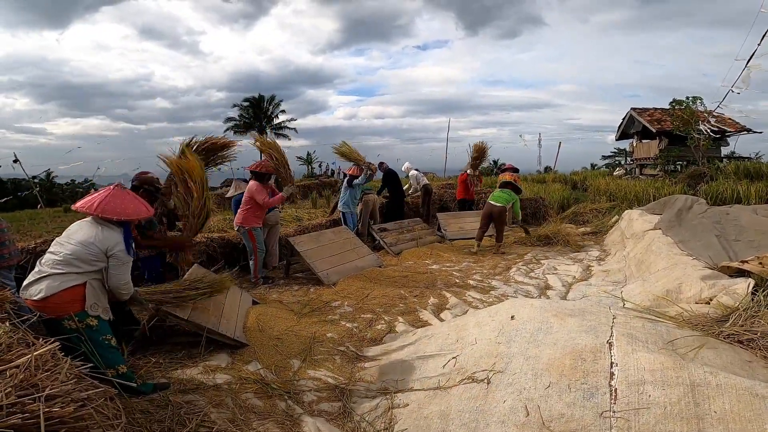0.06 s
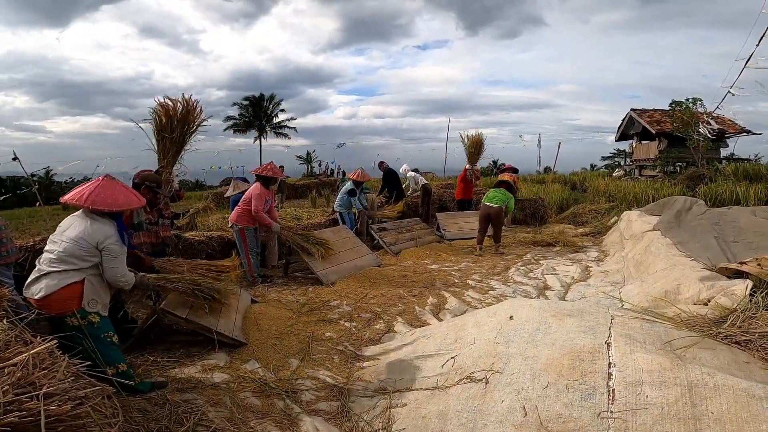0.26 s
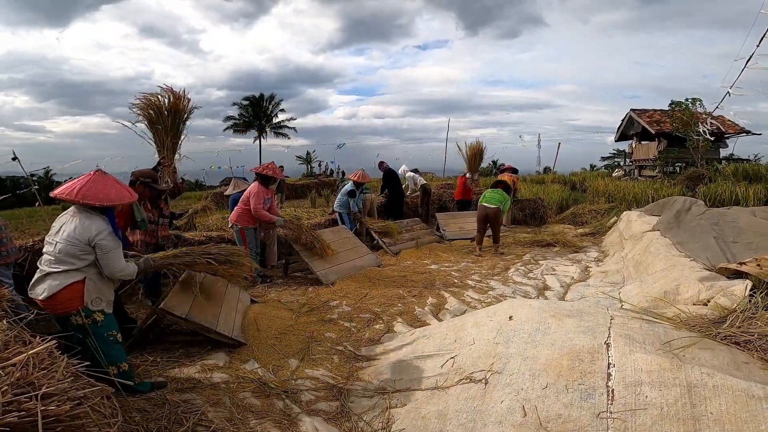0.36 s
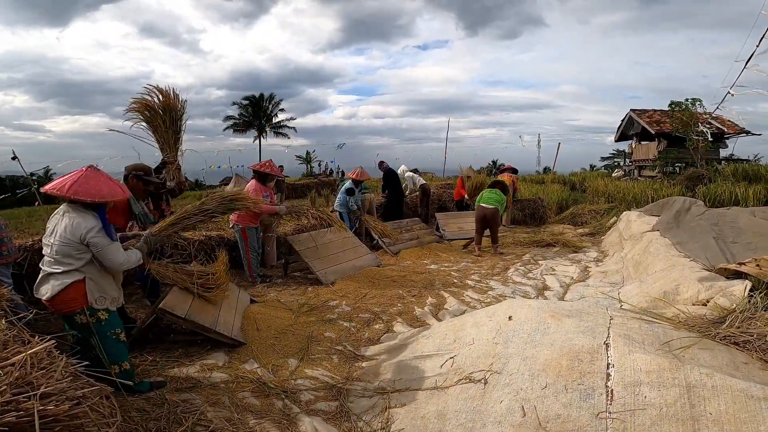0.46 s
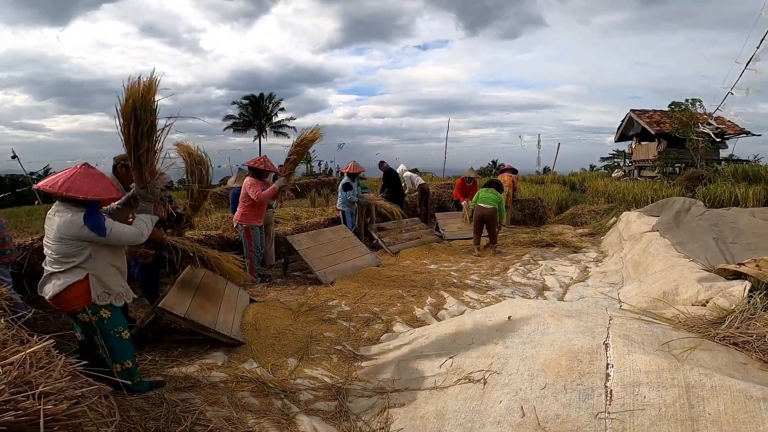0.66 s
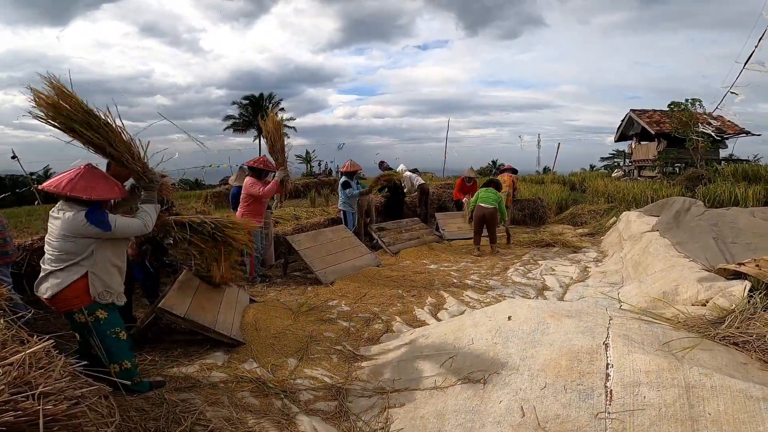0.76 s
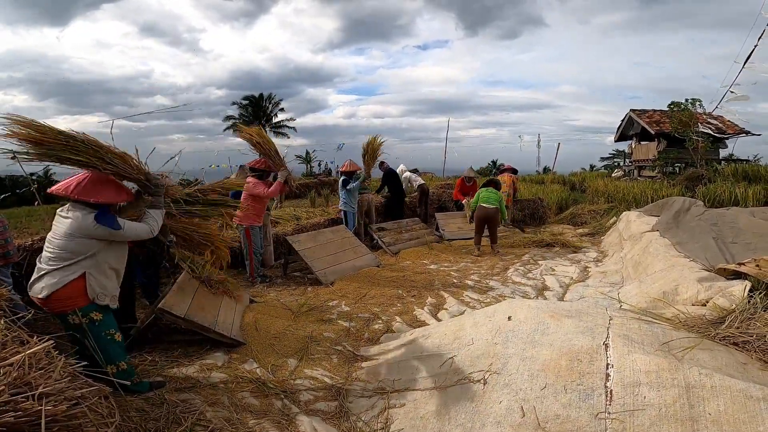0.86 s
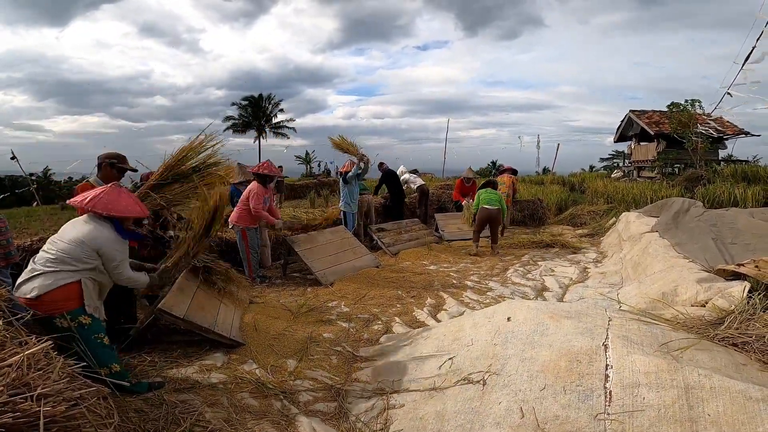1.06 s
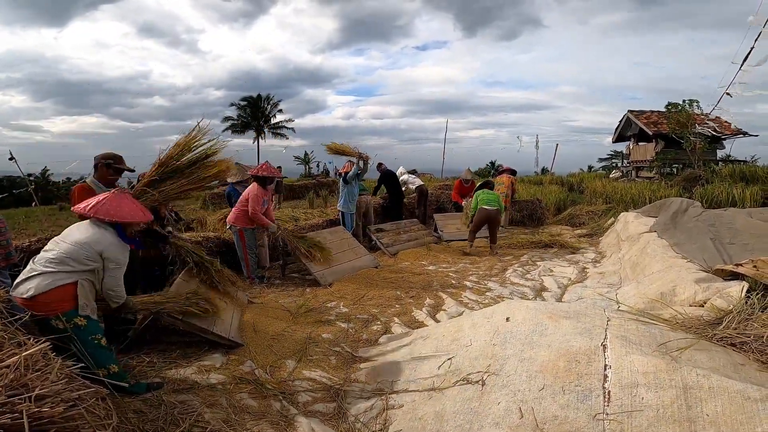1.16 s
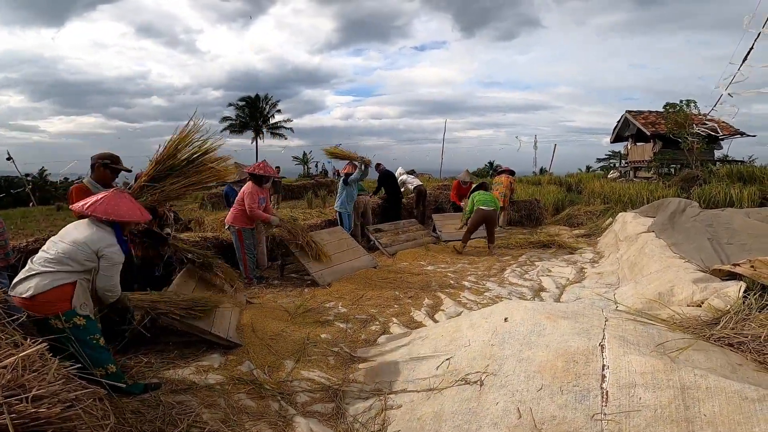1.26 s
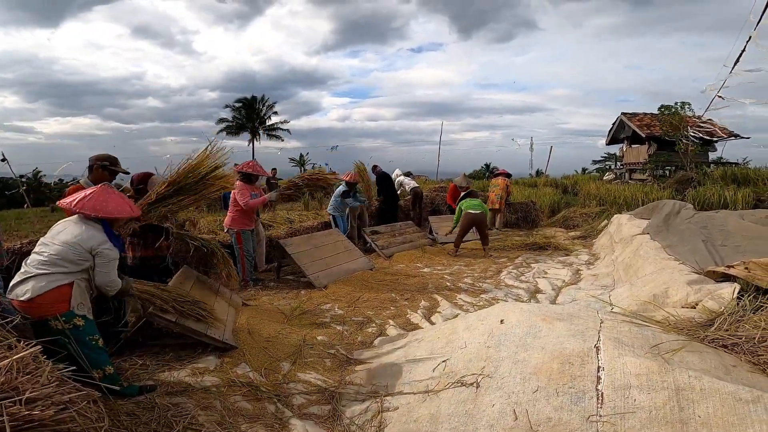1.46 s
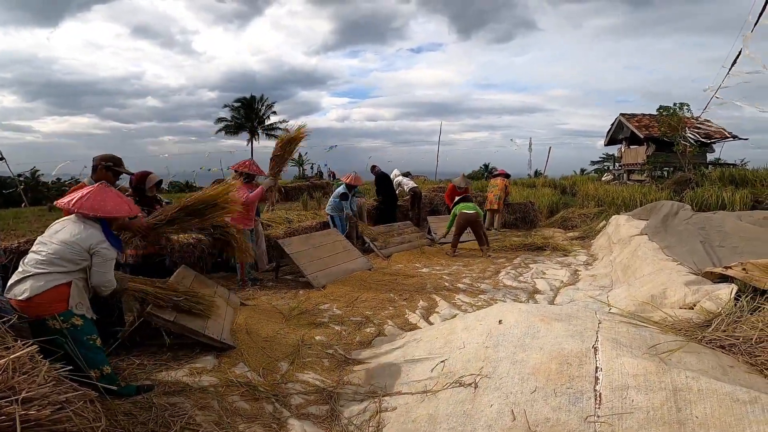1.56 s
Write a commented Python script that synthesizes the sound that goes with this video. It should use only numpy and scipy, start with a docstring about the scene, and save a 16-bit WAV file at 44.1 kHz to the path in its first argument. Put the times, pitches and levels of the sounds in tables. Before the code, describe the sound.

Rice bundles thwack wooden threshing boards in an open field. A near blow swishes and cracks at 0.2 seconds, followed by farther ones at 0.3, 0.4 and 0.6, the last with a heavy knock. Another near swish and hit comes around 0.85, then far and near blows land almost together at 1.2 with a deep thump. Small ticks follow until 1.6. Straw rustles and light wind rumbles throughout.

```python
"""An open field, with a stereo microphone facing two slanted wooden threshing boards, one near, one far.
Farm workers beat bundles of rice on them. A bundle swishes down and lands as a dense burst of stalk
clicks; the board thumps, rings and rattles. Straw rustles all around, stems patter softly, and a light
wind rumbles at the microphone."""
import sys
import numpy as np
from scipy import signal
from scipy.fft import rfft, irfft
from scipy.io import wavfile

SR = 44100
rng = np.random.default_rng(int(sys.argv[2]) if len(sys.argv) > 2 else 0)


def digitize_waveform(pressure):
    """Quantize a signal to 16-bit integers and store it at the path in sys.argv[1].

    Rows of a 2-D input are taken as channels; values are limited to [-1, 1].
    """
    field = np.atleast_2d(pressure).T
    bounded = np.clip(field, -1, 1)
    quanta = np.round(bounded * 32767).astype(np.int16)
    wavfile.write(sys.argv[1], SR, quanta)


N = 70560

# Tone of each sound. Each row: frequency in Hz, relative level in dB.
WIND_TONE = [(10, -8), (28, 2.5), (48, 10), (80, -5.5), (110, -4.5), (160, -7), (230, -18), (350, -25.5),
             (1000, -47.5), (4000, -83)]
RUSTLE_TONE = [(150, 5), (350, -7.5), (600, -3), (800, -7.5), (1200, -3), (2200, -0.5), (3600, -0.5),
               (5500, -5), (8000, -8.5), (11000, -17), (16000, -27)]
PATTER_TONE = [(100, 3), (350, -4.5), (550, -2), (800, -3.5), (1250, 0), (2200, -8.5), (4000, -16.5),
               (16000, -71)]
SWISH_TONE = [(100, -24), (400, -5.5), (1000, 1.5), (2200, 1), (3800, 2.5), (5500, -3.5), (8000, -4),
              (11000, -13), (16000, -28)]
CLATTER_TONE = [(30, 3), (100, 5), (280, 1), (370, -15), (560, -2), (780, -13), (1050, -3.5), (2000, -18.5),
                (4000, -30), (8000, -35), (16000, -47)]
CRACK_TONE_BY_BOARD = {"near": [(30, -20), (150, 9.5), (280, -4.5), (370, -6), (490, 2.5), (630, 0.5),
                       (780, -5.5), (950, -0.5), (1650, -2.5), (2700, -2.5), (5000, -6), (8000, -10.5),
                       (11000, -23), (16000, -35)], "far": [(30, 9.5), (150, 0), (280, -5), (370, -12.5),
                       (490, 2.5), (660, -10), (800, -13), (1100, 3), (2200, 0), (2800, -3), (4500, -3.5),
                       (7500, -11.5), (11000, -20.5), (16000, -35)]}
# Rise and fall of the background. Each row: time in seconds, level in dB.
WIND_LEVEL = [(0, -41.5), (.3, -34.5), (.55, -37.5), (.8, -36), (1.0, -36), (1.33, -39.5), (1.42, -47.5),
              (1.54, -46), (1.6, -38)]
RUSTLE_LEVEL = [(0, -45), (.3, -43.5), (.5, -46), (.72, -43), (1.05, -43), (1.3, -43), (1.6, -45)]
PATTER_LEVEL = [(0, -56), (.5, -49.5), (1.0, -83), (1.28, -49.5), (1.38, -50), (1.6, -44)]
# How alike left and right are at the microphone. Each row: frequency in Hz, likeness from 0 to 1.
WIND_LIKENESS = [(30, 0.25), (70, 0.38), (150, 1), (400, 0.71)]
FIELD_LIKENESS = [(30, 0.17), (70, 1), (150, 1), (900, 0.84), (2000, 0.71), (4000, 0.64), (7000, 0.48),
                  (12000, 0.83)]
DIRECT_LIKENESS = [(100, 0.98), (900, 0.97), (2000, 0.87), (4000, 0.76), (7000, 0.93), (12000, 0.94)]
# Where the field and each board sit in the stereo picture. Each entry: lag of the left side in
# milliseconds, left over right in dB in the mids, the same in the treble.
FIELD_POSITION = (0.015, 1, -2.6)
BOARD_POSITIONS = {"near": (0.0095, 2.4, -2.6), "far": (0.026, .2, -4.5)}
# Knocks and rebounds of the boards, near and far off.
# Each row: start in seconds, level in dB, pitch in Hz, t60 in seconds.
BOARD_KNOCKS = [(0.319, -32, 1800, 0.024), (.337, -19, 1800, 0.019), (.345, -30, 666, 0.16),
                (0.4686, -19, 576, 0.021), (.472, -29, 408, 0.052), (0.639, -11, 151, 0.046),
                (.657, -34, 2980, 0.027), (.883, -23, 946, 0.16), (0.912, -25, 896, 0.085),
                (0.912, -20.5, 286.8, 0.15), (1.231, -16, 55, 0.087), (1.24, -25.5, 1790, 0.026),
                (1.342, -32.5, 1180, 0.02), (1.396, -30.5, 1630, 0.015), (1.474, -32, 1890, 0.011),
                (1.524, -30, 1800, 0.011), (1.575, -36, 1380, 0.0098)]
# Wood modes of a knock. Each row: ratio to its pitch, relative level in dB, share of its t60.
WOOD_MODES = [(0.483, -3.5, 0.81), (0.997, 1.5, 0.68), (1.33, -7.5, 0.43)]
# Bundles swung through the air. Each row: peak time, rise and fall in seconds, level in dB.
SWINGS = [(0.206, 0.023, 0.0033, -27.5), (.577, 0.019, 0.036, -34), (0.769, 0.0028, 0.014, -41.5),
          (0.849, 0.013, 0.022, -25.5), (1.052, 0.0046, 0.0063, -37.5), (1.176, 0.063, 0.019, -40.5)]
# Modes of each board. Each row: frequency in Hz, relative level in dB, base t60 in seconds.
BOARD_MODES = {"near": [(149.5, -1, 0.35), (181, 2, 0.194), (244.7, -3, 0.34), (287.4, 2.5, 0.243),
               (496, -2.5, 0.099), (610.6, 2.5, 0.15), (890, -13, 0.07), (915, 2, 0.15), (1330, 2, 0.11)],
               "far": [(108, -1, 0.086), (148.7, 3, 0.2), (276.5, -23.5, 0.34), (565, -0.5, 0.12),
               (698, 0, 0.087), (915, -2, 0.093), (1190, -2.5, 0.085), (1657, -1, 0.08), (2214, 4, 0.05)]}
# Decay of the loose planks' clatter. Each row: frequency in Hz, base t60 in seconds.
CLATTER_DECAY = [(60, 0.34), (300, 0.31), (1000, 0.16), (3000, 0.21), (10000, 0.11)]
# Bundles landing. Each row: start, rise, hold and t60 of the crack in seconds; its level, treble and
# sizzle in dB; its bite (a peak in the tone) in Hz and dB; ring gain in dB, ring length as a factor;
# thump level in dB, pitch in Hz and t60 in seconds; which board.
BUNDLE_BLOWS = [(0.2051, 0.0097, 0.0036, 0.045, -13.5, 0.7, 0.5, 1350, 3, -30, 0.75, -18.5, 80.6, 0.23, "near"),
                (0.286, 0.0035, 0.0085, 0.021, -15, -4, 6, 2400, 4.5, -29.5, 1.53, -26, 72, 0.075, "far"),
                (0.39, 0.0059, 0.0064, 0.033, -16, -1.7, 5.5, 4000, 5.5, -30, 0.83, -21, 94, 0.038, "far"),
                (0.631, 0.0016, 0.0083, 0.035, -20.5, 0.5, 3, 3300, 7.5, -26, 0.66, -18, 67.8, 0.19, "far"),
                (0.858, 0.0074, 0.0064, 0.11, -18.5, -3.5, 5.5, 1460, 3, -28, 0.98, -23, 75.6, 0.071, "near"),
                (0.9, 0.00613, 0.019, 0.08, -27, -2, 6, 880, 4, -40, 0.85, -26.5, 34, 0.35, "near"),
                (1.183, 0.009, 0.0025, 0.053, -14.5, -1.5, 0.5, 1920, 3.5, -24.5, 0.69, -21.5, 62.5, 0.078, "far"),
                (1.211, 0.0061, 0.00083, 0.048, -16, 1.2, 2.5, 5630, 1.5, -27, 0.66, -10.5, 56.6, 0.12, "near")]


def amp(db):
    """Decibels to gain."""
    return 10 ** (np.asarray(db) / 20)


def unit(x):
    """Scales to rms 1."""
    return x / np.sqrt(np.mean(x ** 2) + 1e-20)


def read(points, hz):
    """Reads a table on a log-frequency axis."""
    table_hz, value = np.transpose(points)
    return np.interp(np.log(hz + 1), np.log(table_hz + 1), value)


def fader(levels):
    """Gain across the scene, gliding between levels in dB."""
    return amp(np.interp(np.arange(N) / SR, *np.transpose(levels)))


def add(mix, start, sound):
    """Adds a sound into the mix at a start in seconds."""
    part = mix[:, max(round(start * SR), 0):][:, :sound.shape[-1]]
    part += sound[..., :part.shape[-1]]


def decay(t, t60):
    """Exponential decay, 60 dB in t60 seconds."""
    return np.exp(-np.log(1000) * np.maximum(t, 0) / t60)


def colour(x, tone, size=4096):
    """Minimum-phase filter of unit energy with the given tone."""
    log_gain = np.log(amp(read(tone, abs(np.fft.fftfreq(size, 1 / SR)))))
    taps = np.fft.ifft(np.exp(np.conj(signal.hilbert(log_gain)))).real[:size // 2]
    return signal.fftconvolve(x, taps[None] / np.linalg.norm(taps), axes=1)[:, :x.shape[1]]


def clicks(n, per_s, spread_db):
    """Two unrelated trains of clicks of uneven size, rms 1."""
    size = amp(spread_db * np.minimum(rng.exponential(1, (2, n)), 4))
    return unit(size * rng.choice([-1, 1], (2, n)) * (rng.random((2, n)) < per_s / SR))


def stereo(pair, likeness, position):
    """Blends two unrelated signals into the microphone's left and right, with a lag and a balance."""
    n = pair.shape[1]
    lag_ms, mid_db, treble_db = position
    hz = np.fft.rfftfreq(2 * n, 1 / SR)
    first, second = rfft(pair, 2 * n)
    same = np.clip(read(likeness, hz), 0, 1)
    mid, side = first * np.sqrt((1 + same) / 2), second * np.sqrt((1 - same) / 2)
    lean_db = read([(500, 0), (2000, mid_db), (4000, mid_db), (11000, treble_db)], hz)
    pan = amp(lean_db / 2) * np.exp(-1j * np.pi * hz * lag_ms / 1000)
    return irfft(np.array([(mid + side) * pan, (mid - side) / pan]))[:, :n]


def wind(left_over_right_db=3):
    """Right at the microphone, a light breeze rumbles differently at each port."""
    rumble = fader(WIND_LEVEL) * unit(colour(rng.standard_normal((2, N)), WIND_TONE))
    balance = amp([[left_over_right_db / 2], [-left_over_right_db / 2]])
    return balance * stereo(rumble, WIND_LIKENESS, FIELD_POSITION)


def field():
    """Straw rustles all around the microphone, with a soft patter of stems and distant threshing."""
    t = np.arange(N) / SR
    rustle = fader(RUSTLE_LEVEL) * colour(clicks(N, per_s=7000, spread_db=1.0), RUSTLE_TONE)
    ticks = abs(clicks(N, per_s=450, spread_db=-0.5)[0])
    envelope = signal.fftconvolve(ticks, decay(t, t60=0.005))[:N]
    patter = fader(PATTER_LEVEL) * unit(colour(envelope * rng.standard_normal((2, N)), PATTER_TONE))
    return stereo(rustle + patter, FIELD_LIKENESS, FIELD_POSITION)


def knocks(rise_s=0.0008, straw_gain=0.81, straw_db_per_octave=21.5, straw_max_t60=0.092):
    """Dull knocks, dead centre: three damped wood modes and a burst of crushed straw near their pitch."""
    out, t = np.zeros((2, N)), np.arange(SR // 4) / SR
    for start, db, hz, t60 in BOARD_KNOCKS:
        wood = sum(amp(mode_db) * decay(t, t60 * share) * np.sin(2 * np.pi * hz * ratio * t)
                   for ratio, mode_db, share in WOOD_MODES)
        straw_tone = [(hz * 2. ** octave, -straw_db_per_octave * abs(octave)) for octave in range(-4, 7)]
        straw = colour(rng.standard_normal((1, len(t))), straw_tone)[0]
        straw *= decay(t, min(t60, straw_max_t60))
        knock = (wood + straw_gain * straw) / np.hypot(1, straw_gain)
        add(out, start, amp(db) * np.minimum(t / rise_s, 1) * knock)
    return out


def swishes():
    """At the near board, dry stalks brush together as a bundle is swung."""
    t = np.arange(N) / SR
    power = sum((amp(db) * np.exp(np.minimum((t - peak) / rise, (peak - t) / fall))) ** 2
                for peak, rise, fall, db in SWINGS)
    brushing = np.sqrt(power) * clicks(N, per_s=9000, spread_db=3)
    return stereo(colour(brushing, SWISH_TONE), DIRECT_LIKENESS, BOARD_POSITIONS["near"])


def planks(t, length, board, modes_db=2.5, clatter_db=6):
    """The board's modes ring over a dense wooden clatter, longer or shorter from blow to blow; a bundle left
    lying on it shortens both."""
    phases = rng.uniform(0, 2 * np.pi, len(BOARD_MODES[board]))
    ring = sum(amp(db) * decay(t, t60 * length) * np.sin(2 * np.pi * hz * t + phase)
               for (hz, db, t60), phase in zip(BOARD_MODES[board], phases))
    noise = colour(rng.standard_normal((2, len(t))), CLATTER_TONE)
    band_hz, times, bands = signal.stft(noise, SR, nperseg=256)
    band_t60 = length * read(CLATTER_DECAY, band_hz)[:, None]
    clatter = signal.istft(bands * decay(times, band_t60), SR)[1][:, :len(t)]
    return amp(modes_db) * ring + amp(clatter_db) * clatter


def thump(t, hz, t60):
    """The weight of the bundle pushes the whole board against the ground."""
    return -decay(t, t60) * np.sin(2 * np.pi * hz * t)


def stalks(envelope, treble_db, sizzle_db, bite_hz, bite_db, board,
           bite_octaves=0.26, sizzle_hz=12400, sizzle_octaves=0.64):
    """Hundreds of stalks slap the board: each bundle bites at its own pitch, and the dry tips sizzle."""
    hz = np.geomspace(30, 20000, 120)
    treble = treble_db * np.clip(np.log2(hz / 2000), 0, 1)
    bite = bite_db * np.exp(-(np.log2(hz / bite_hz) / bite_octaves) ** 2 / 2)
    sizzle = sizzle_db * np.exp(-(np.log2(hz / sizzle_hz) / sizzle_octaves) ** 2 / 2)
    tone = np.transpose([hz, read(CRACK_TONE_BY_BOARD[board], hz) + treble + bite + sizzle])
    return colour(envelope * clicks(len(envelope), per_s=16000, spread_db=2.5), tone)


def blows(board_rise_s=0.0083):
    """Bundles land on the near and far boards: the stalks crack, then the wood rings and thumps."""
    out, t = np.zeros((2, N)), np.arange(SR // 2) / SR
    board_onset = np.minimum(t / board_rise_s, 1)
    for (start, rise, hold, t60, crack_db, treble_db, sizzle_db, bite_hz, bite_db,
         ring_db, ring_length, thump_db, thump_hz, thump_t60, board) in BUNDLE_BLOWS:
        envelope = np.minimum(t / rise, 1) * decay(t - rise - hold, t60)
        crack = stalks(envelope, treble_db, sizzle_db, bite_hz, bite_db, board)
        ring = board_onset * planks(t, ring_length, board)
        add(out, start, amp(crack_db) * stereo(crack, DIRECT_LIKENESS, BOARD_POSITIONS[board]))
        add(out, start + rise, amp(ring_db) * stereo(ring, DIRECT_LIKENESS, BOARD_POSITIONS[board]))
        add(out, start + rise, amp(thump_db) * board_onset * thump(t, thump_hz, thump_t60))
    return out


def scene():
    """The threshing floor as heard from the microphone."""
    return blows() + swishes() + field() + wind() + knocks()


def record(dry, cutoff_hz=15950):
    """The recorder's band limit cuts off the highest treble."""
    lowpass = signal.firwin(511, cutoff_hz, window=("kaiser", 9), fs=SR)
    return signal.oaconvolve(dry, lowpass[None], "same")


dry = scene()
out = record(dry)
digitize_waveform(out)
```